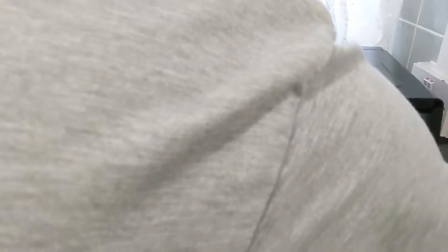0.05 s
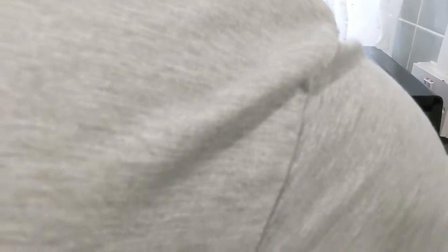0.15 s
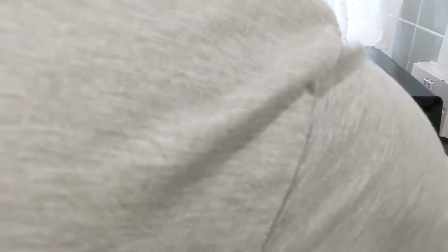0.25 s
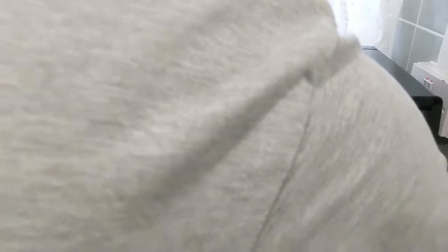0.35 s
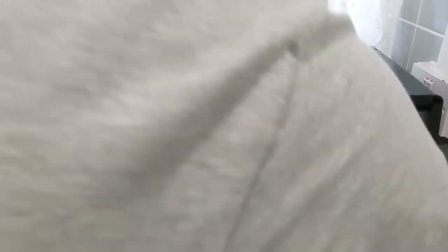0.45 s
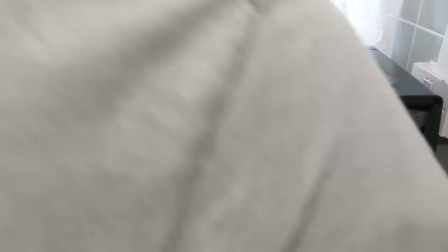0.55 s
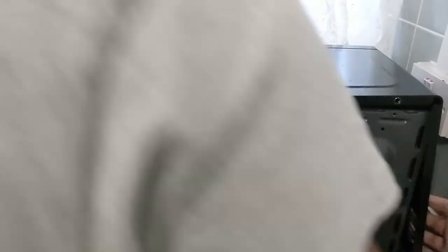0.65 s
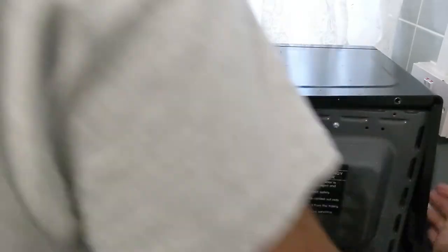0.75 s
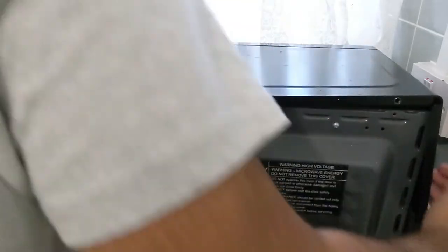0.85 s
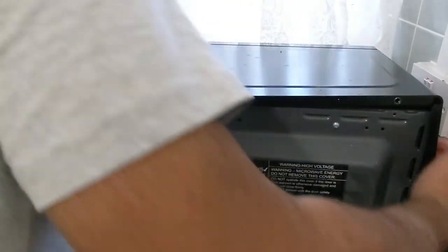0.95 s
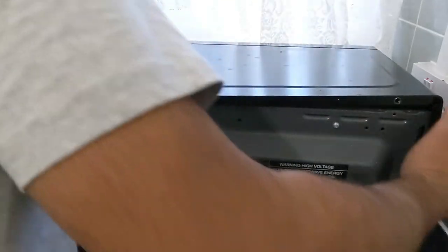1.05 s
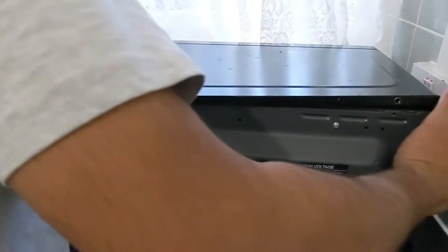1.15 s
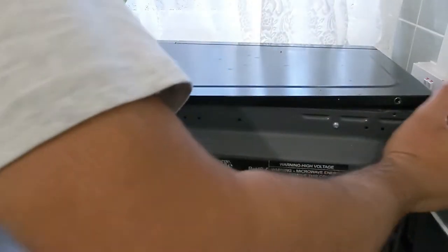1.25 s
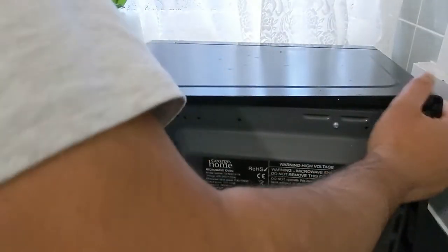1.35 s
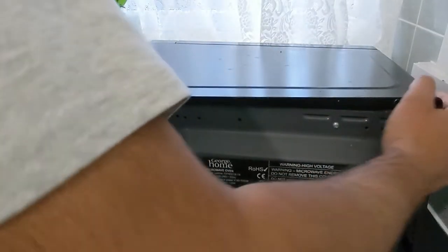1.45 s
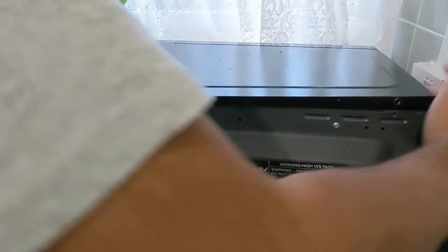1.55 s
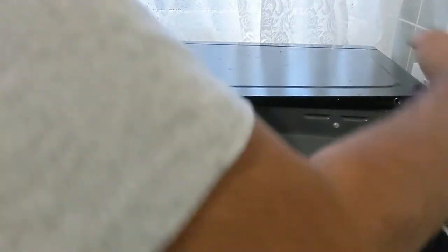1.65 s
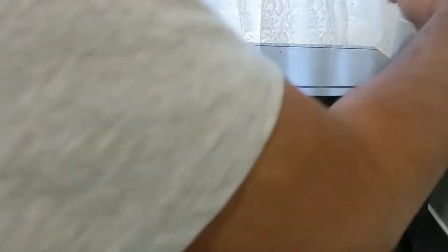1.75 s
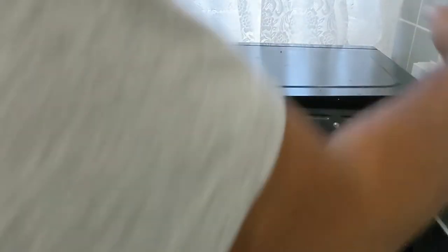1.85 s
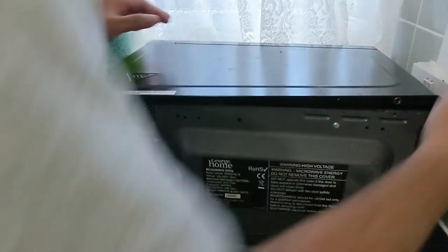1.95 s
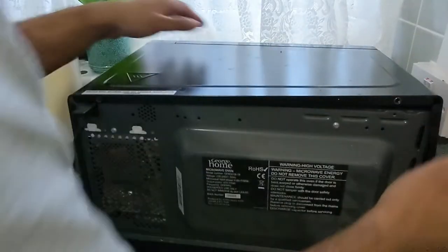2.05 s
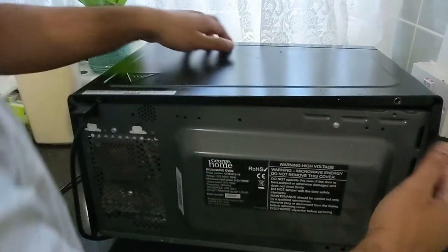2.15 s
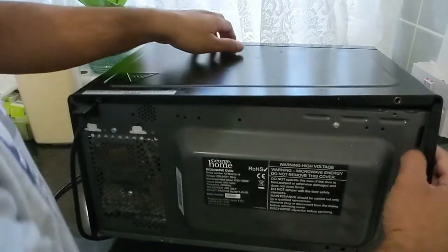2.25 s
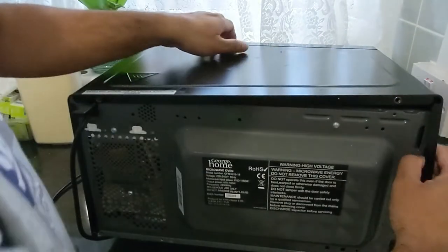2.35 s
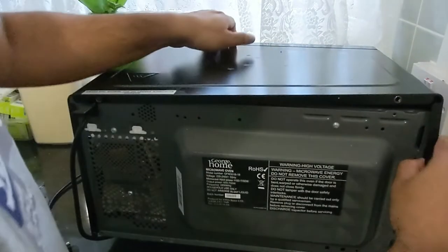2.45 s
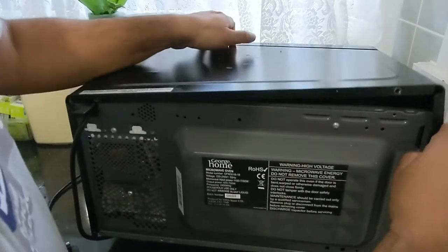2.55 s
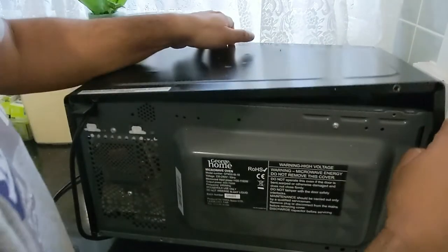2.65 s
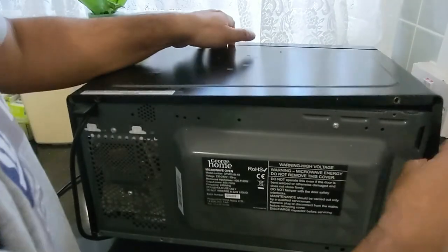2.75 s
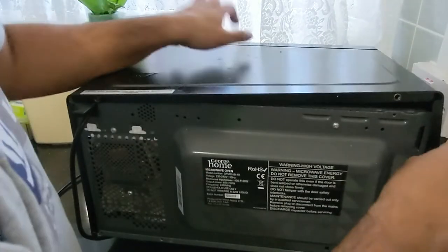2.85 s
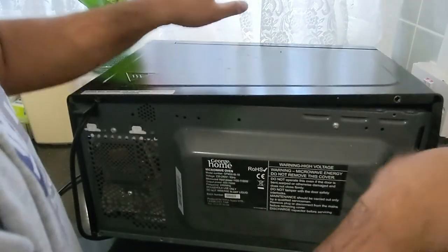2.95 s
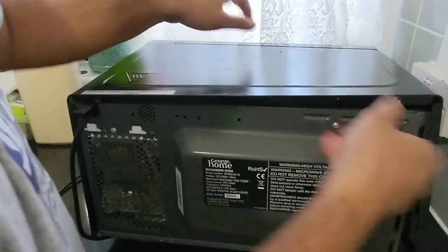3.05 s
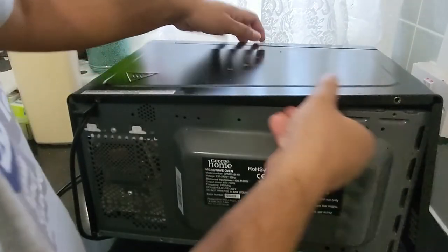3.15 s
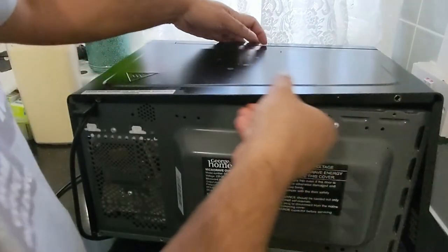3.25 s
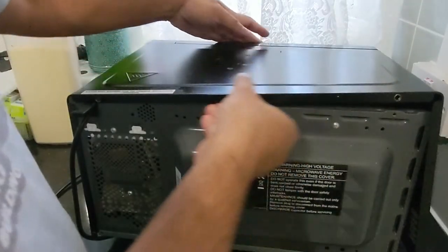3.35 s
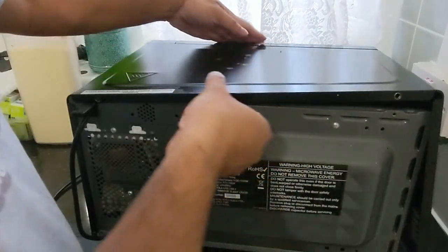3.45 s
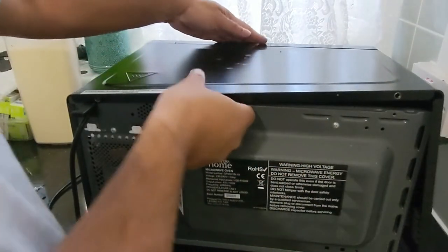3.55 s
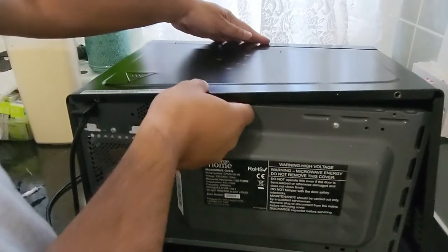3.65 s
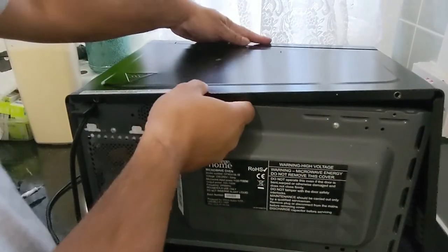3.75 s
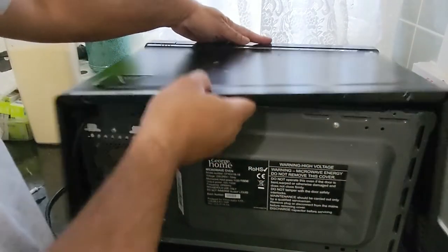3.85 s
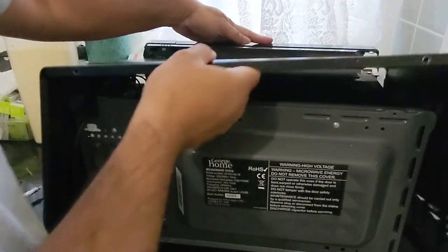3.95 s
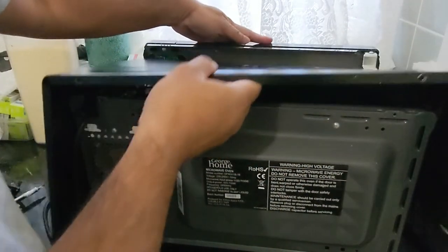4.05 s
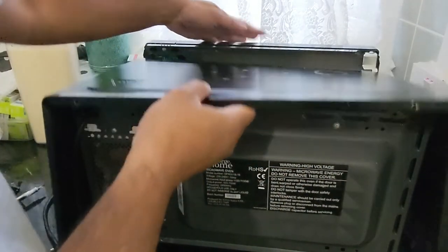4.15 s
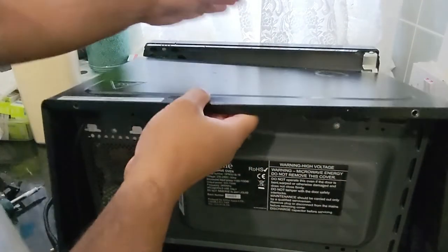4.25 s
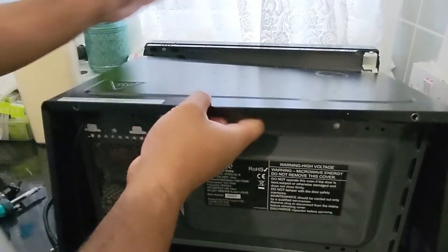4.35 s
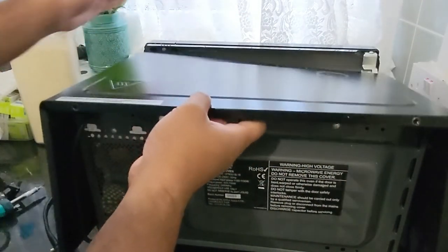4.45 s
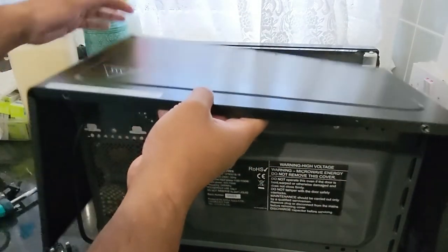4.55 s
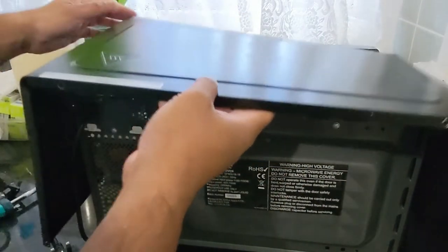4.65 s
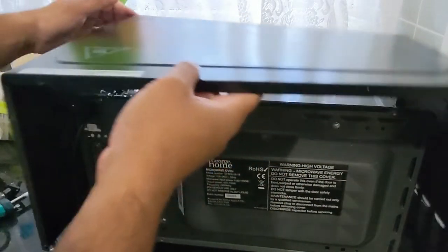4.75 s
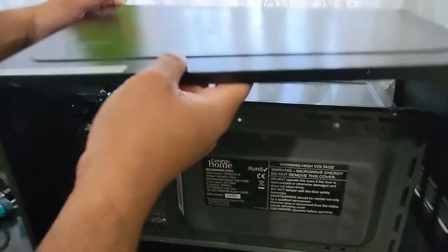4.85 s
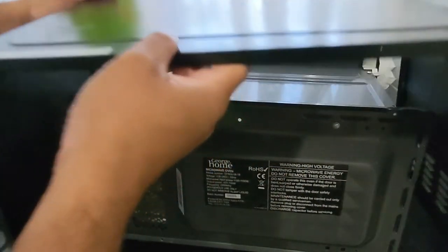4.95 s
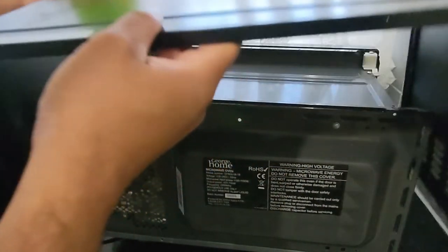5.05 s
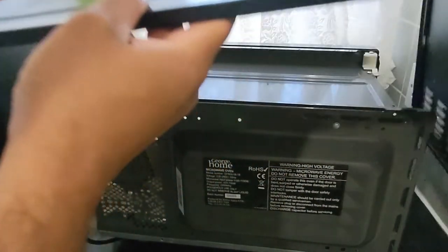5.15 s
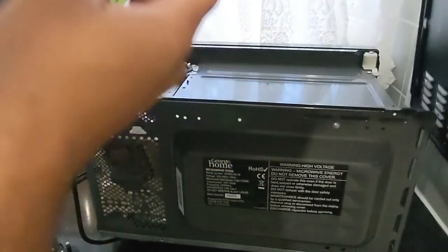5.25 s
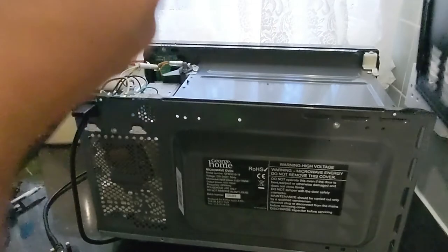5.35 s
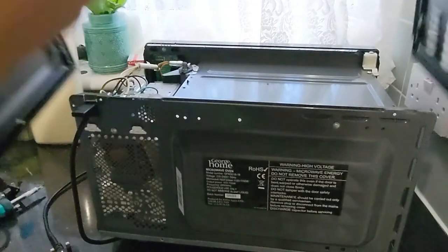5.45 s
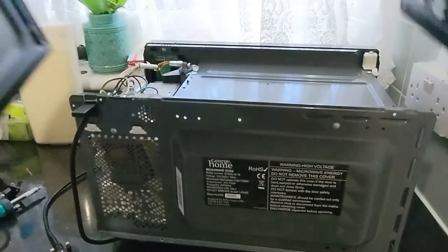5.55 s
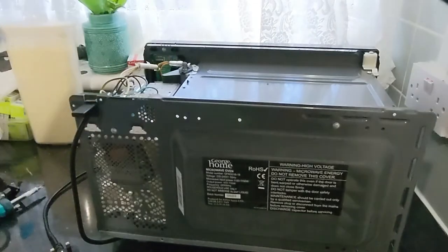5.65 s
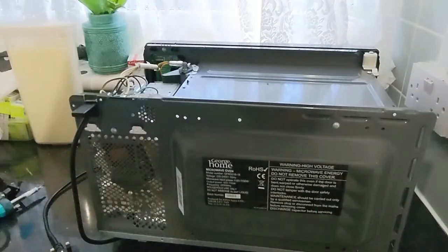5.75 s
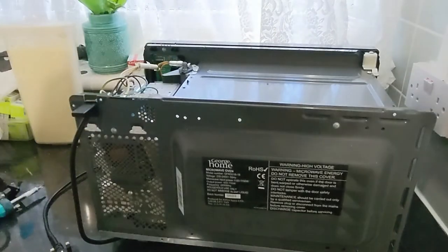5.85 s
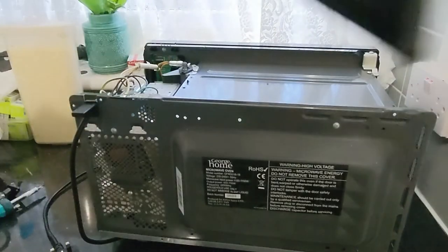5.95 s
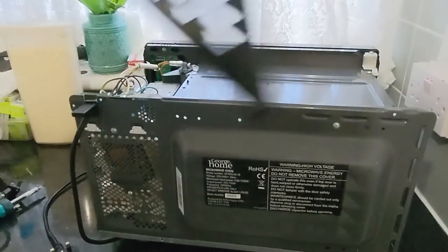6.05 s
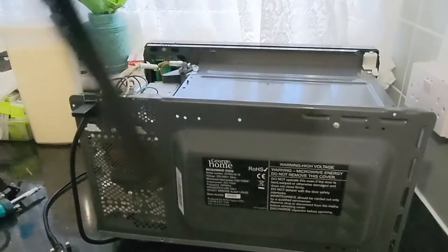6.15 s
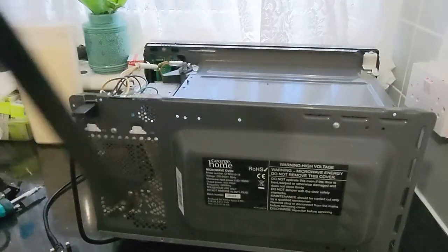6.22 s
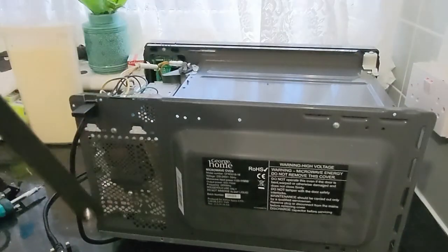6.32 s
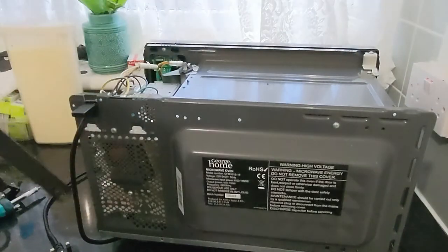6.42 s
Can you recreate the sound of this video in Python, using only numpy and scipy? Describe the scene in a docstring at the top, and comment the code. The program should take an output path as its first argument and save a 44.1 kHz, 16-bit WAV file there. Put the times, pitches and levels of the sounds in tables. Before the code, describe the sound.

Hands knock and rub a metal appliance cover, then it breaks loose with loud scraping, clashing and ringing before quiet room air returns.

```python
"""Oven cover lifted off its frame

Small tiled kitchen, heard close by in stereo: hands knock, rub and flex a microwave oven's seated sheet-metal cover.
It breaks free, scrapes and clashes along the frame and rings, then grazes something as it is carried away.
Taps set off decaying noise bands and, once loose, wavering modes; strokes are trains of tiny taps.
Flexes, squeaks and hum are tones; swishing cloth and skin and the room air are shaped noise."""
import sys
import numpy as np
from scipy import signal
from scipy.io import wavfile

SR = 44100
rng = np.random.default_rng(int(sys.argv[2]) if len(sys.argv) > 2 else 0)


def inscribe(sig):
    """Save sig as 16-bit PCM at rate SR to the path in sys.argv[1].

    A 1-D sig is mono; a 2-D sig holds one channel per row.
    Samples are clipped to [-1, 1] before scaling.
    """
    pcm = np.round(np.clip(np.atleast_2d(sig).T, -1, 1) * 32767)
    wavfile.write(sys.argv[1], SR, pcm.astype(np.int16))


N = 286031
TIME = np.arange(N) / SR

# Levels are relative: mixing trims follow. Hardness pivots at 1 kHz; left-right is positive to the left.
# clashes of the loose cover: [t/s, strength level/dB, hardness/(dB per octave), left-right/dB]
CLASHES = [(3.869, -13, 1, 0), (3.8965, -7.5, 0.5, 2.5), (3.9075, -27.5, 7.2, -4), (3.9455, -22.5, 2, -5),
           (3.954, -14.5, 2, 4), (4.0423, -12, 0.1, 0), (4.1094, -12.5, -3, -3), (4.1744, -19.5, -3.5, -4),
           (4.265, -22.5, -4.5, 0), (4.3643, -25, 0.7, -1), (4.4997, -30.5, -1.5, 1),
           (4.535, -28.5, -0.3, 0), (4.55, -30.5, -0.5, -2), (4.6094, -18, 0, 0), (4.6259, -7, 0.83, 3),
           (4.6546, -18, -3.5, -1), (4.6815, -15.5, 1.35, -1.5), (4.7385, -14.5, 1.3, -0.5),
           (4.7944, -17.5, -1.5, 7), (4.838, -15.5, -0.5, 1), (4.9787, -23, -0.8, -0.5),
           (5.1091, -27, 2.5, 2), (5.1216, -22.5, -1.3, -1), (5.1672, -25.5, 2, -0.5),
           (5.2795, -25, -2.2, -16), (5.3155, -20, -1.6, 0), (5.357, -12, 1.85, 0.5),
           (5.3874, -15, 0.2, -1)]
# drags of its edges along the frame, at last through the hands:
# [start t/s, length/s, pressure level/dB, hardness/(dB per octave)]
DRAGS = [(3.852, 0.13, -18.5, -3.9), (3.97, 0.2, -13, -0.84), (4.2, 0.096, -21.5, 0.3),
         (4.35, 0.087, -27.5, -1.6), (4.53, 0.11, -23.5, -2), (4.64, 0.16, -16, -1.5),
         (4.86, 0.095, -27.5, -2.5), (4.98, 0.1, -24, -2), (5.13, 0.15, -26.5, 1.1), (5.3, 0.2, -25.5, -2),
         (6.12, 0.2, -55, -1.5), (6.37, .12, -46, 0.1)]
# strong modes of the loose cover: [f/Hz, level/dB]
COVER_MODES = [(134, 2), (142, 1.5), (216, 6.5), (229, -35), (249, -1.5), (299, -3), (366, -5), (397, -1),
               (478, -3.5), (503, 4.5), (566, -1), (596, -7), (630, 1), (701, 0.5), (756, 0), (816, -22),
               (870, -16.5), (1006, -18), (1045, -8), (1213, -6), (1288, -7), (1300, -3), (1392, -5.5),
               (2223, -14.5), (2300, -8)]
# how long those modes ring: [f/Hz, time to fall 60 dB/s]
COVER_T60 = [(140, .48), (230, .5), (400, .64), (700, .55), (1300, .48), (2300, .34)]
# the loose sheet's crowd of weaker modes: [f/Hz, level/dB per Hz]
LOOSE_COLOUR = [(35, -19), (62, -4.5), (100, -24), (135, -2.5), (210, -8), (300, -3), (500, -1),
                (950, -11.5), (1300, -16), (1700, -13.5), (3200, -22), (5000, -22.5), (6800, -18.5),
                (10000, -29), (14000, -24)]
# how fast that crowd dies away: [f/Hz, time to fall 60 dB/s]
LOOSE_T60 = [(100, 0.64), (400, 0.33), (1500, 0.4), (5000, 0.32), (14000, 0.2)]
# knocks on the seated, damped cover: [t/s, strength level/dB, hardness/(dB per octave), left-right/dB]
KNOCKS = [(.1665, -38, -1.2, -2), (.2555, -33.5, .5, -1.5), (.358, -32, -1.9, -4),
          (.4064, -39.5, -2.7, -10), (.515, -45.5, 0, 1), (.7691, -47, -3, -3), (1.4885, -62, 7, -1),
          (1.572, -50, -.3, -1), (1.6634, -57, 5.6, -1), (2.1732, -29, 1.9, 1.5), (2.359, -31, 1.2, 0),
          (2.578, -39, -3.5, 0), (2.6396, -41, -2.7, 1), (2.7583, -21, 1, 1.5), (2.7813, -26, -2.5, -4),
          (2.8384, -49, 5.7, -1), (3.159, -35, .4, -2.5), (3.1838, -35.5, 2.6, 2), (3.533, -44, -1.5, 3),
          (3.689, -43, -1.5, 0), (3.766, -40, -6, 1)]
# strokes of the hands on the seated cover: [start t/s, length/s, pressure level/dB, hardness/(dB per octave)]
RUBS = [(.1, 0.049, -44.5, -1.5), (.16, 0.2, -36.5, -2), (.35, .09, -38.5, 0), (.48, .14, -52, -3.5),
        (.77, 0.069, -44.5, -1.5), (.92, 0.18, -66, -4.5), (1.1, 0.31, -57.5, 2.2),
        (1.39, 0.081, -42.5, -2), (1.52, 0.33, -53, -1.2), (2.21, 0.087, -29, -1.14),
        (2.36, 0.046, -39, -2.5), (2.55, 0.21, -37.5, -2), (2.72, 0.12, -28.5, -2.5),
        (2.86, 0.18, -45.5, -2), (3.18, 0.078, -37, -3), (3.35, .13, -51, -3.2), (3.57, 0.11, -47.5, -3),
        (3.69, 0.39, -41.5, -1)]
# the seated sheet's crowd of modes: [f/Hz, level/dB per Hz]
SEATED_COLOUR = [(35, -25), (60, 9.5), (90, -32), (140, 7.5), (200, 0), (290, -15.5), (420, -3.5),
                 (700, -18.5), (1250, -19), (1700, -20), (3200, -33), (5000, -39), (6800, -34.5),
                 (10000, -50), (14000, -43)]
# how fast the seated sheet dies away: [f/Hz, time to fall 60 dB/s]
SEATED_T60 = [(100, 0.4), (400, 0.34), (1500, 0.39), (5000, 0.34), (14000, 0.34)]
# the cover's edge clacks on something in passing: [t/s, strength level/dB, hardness/(dB per octave), left-right/dB]
CLACKS = [(5.7414, -50.5, 7.5, 2.5), (5.8325, -38, -0.5, 8), (5.8368, -26, 1, 0.5), (5.858, -49.5, -6.5, 1)]
# the edge brushes past: [start t/s, length/s, pressure level/dB, hardness/(dB per octave)]
BRUSHES = [(5.785, 0.07, -31.5, 3.06)]
# colour of the passing clack: [f/Hz, level/dB per Hz]
GRAZE_COLOUR = [(59, -51), (100, -15), (215, -8), (249, -13), (583, -7), (676, -17.5), (2370, -13),
                (3540, -26), (14100, -37), (16000, -41)]
# decay of the passing clack: [f/Hz, time to fall 60 dB/s]
GRAZE_T60 = [(400, 0.62), (2000, 0.33), (12000, 0.42)]
# squeaks and groans of skin and metal: [t/s, f/Hz, level/dB, width/Hz, fade time constant/s]
SQUEAKS = [(.256, 485, -34, 300, 0.061), (.364, 1200, -30, 148, 0.038), (.37, 814, -29.5, 62.5, 0.038),
           (.778, 456, -57, 305, 0.065), (1.425, 512, -43.5, 260, .05), (1.577, 676, -45, 107, 0.071),
           (1.669, 2250, -50.5, 900, 0.052), (1.78, 1970, -51, 1320, .05), (2.175, 827, -25.5, 258, .018),
           (2.578, 499.6, -31.5, 296, 0.098), (3.183, 448, -30, 92, 0.031), (3.769, 598, -30, 174, 0.015),
           (4.21, 3860, -33, 200, 0.026), (4.265, 3790, -29.5, 180, 0.037), (4.364, 3850, -30.5, 200, 0.04),
           (4.628, 1335, -14, 126, .041), (4.802, 481, -10, 67, 0.034), (4.996, 3110, -29, 163, .026),
           (6.21, 632, -49, 62.4, 0.1), (6.365, 630, -39.5, 48, 0.039)]
# a dragged edge sets the modes around one pitch singing:
# [t/s, centre f/Hz, spread/octaves, level/dB, fade time constant/s]
SINGING = [(4.031, 493, 0.061, -13, 0.25), (4.07, 761, .2, -11.5, 0.098), (5.375, 402, 0.13, -12, 0.078)]
# a panel flexes and booms: [crest t/s, f/Hz, level/dB, half length/s]
FLEXES = [(.208, 174, -28.5, .025), (.345, 144, -25.5, 0.013), (1.44, 165, -35.5, 0.04),
          (2.08, 59.7, -47, .086), (2.25, 198, -29.5, 0.022), (2.315, 57.4, -25.5, 0.056),
          (2.81, 207, -25.5, 0.058), (2.88, 143, -24.5, 0.062), (2.9, 195, -31.5, 0.094),
          (3.38, 137, -29.5, 0.026), (3.71, 127, -34, 0.025), (4.06, 250.5, -21, 0.06),
          (4.2, 140.2, -17.5, .15), (4.72, 139, -37, 0.15), (4.73, 210.4, -17, 0.056),
          (5.19, 60, -26, 0.054), (5.45, 133.2, -14.5, .041)]
# sleeve and palm swishing: [crest t/s, level/dB, half length/s]
SWISHES = [(.32, -68, 0.16), (1.167, -57.5, 0.045), (1.49, -57.5, .11), (3.39, -56, 0.089),
           (3.75, -63, .05), (6.25, -60, 0.36)]
# colour of that bright hiss: [f/Hz, level/dB per Hz]
SWISH_COLOUR = [(300, -20), (1500, 8), (4000, -4), (7000, 1.5), (10500, -2), (14000, 2)]
# colour of the room air: [f/Hz, level/dB per Hz]
AIR_COLOUR = [(18, -35), (30, 4), (86, 7.5), (221, 0.5), (287, -3), (540, -1.5), (937, -15.5), (1390, -11),
              (1540, -19.5), (2290, -13), (3580, -21), (7090, -20.5), (10800, -24.5), (14000, -15),
              (16000, -49)]
# steady hum: [f/Hz, level/dB]
HUM = [(217, -59.5), (395, -71), (1425, -71.5)]
# likeness of the left and right noise: [f/Hz, correlation]
LIKENESS = [(60, .98), (150, .96), (270, .6), (500, .25), (1000, -.1), (3000, 0), (14000, 0)]
# edges between the four registers boom, clang, rattle and tick: [f/Hz]
CROSSOVERS_HZ = [300, 1000, 3500]
# middles of the four registers: [f/Hz]
REGISTER_HZ = np.array([170, 550, 1900, 7000])

LEFT_RIGHT = np.array([[1], [-1]])
AIR_DB = -52.5
SINGING_WIDTH_HZ, SINGING_DB, FRICTION_DB = 9.5, -8.0, 4.5
EASE_DB_PER_S, LET_GO_S = 7.5, 0.021
CUTOFF_HZ = 15800


def loose_cover(count=4):
    """Held only by its edges, the sheet rings on its own modes, in a different mix at each place."""
    places = []
    for _ in range(count):
        modes = cover_modes(swell_s=0.0073, spread_hz=615, uneven_db=1.5)
        crowd = sheet(LOOSE_COLOUR, LOOSE_T60, build_cycles=1.7, crack_db=-3.5, crack_s=0.01)
        places.append(registers(modes + crowd))
    clashes = blows(CLASHES, places[1:], trim_db=[-8.5, -7.5, -8.5, -12.0], chatter_s=0.006, chatter_db=-11.5)
    drags = sliding(DRAGS, places[0], trim_db=[-6.0, -2.0, -6.5, -11.0],
                    slips_per_s=170, uneven_db=5.5, grip_s=0.017)
    return clashes + drags


def seated_cover(count=3):
    """Frame and hands damp the sheet: short, dull knocks and rubbing."""
    places = [registers(sheet(SEATED_COLOUR, SEATED_T60, build_cycles=0.77, crack_db=3.5, crack_s=0.016))
              for _ in range(count)]
    knocks = blows(KNOCKS, places, trim_db=[-9.5, -3.5, -7.0, -13.5], chatter_s=0.0053, chatter_db=-24.5)
    rubs = sliding(RUBS, places[0], trim_db=[-2.5, -3.5, -11.0, -13.0],
                   slips_per_s=800, uneven_db=3.5, grip_s=0.01)
    return knocks + rubs


def graze():
    """A light, dry clack and brush of the edge, made of decaying noise without the cover's strong modes."""
    place = registers(sheet(GRAZE_COLOUR, GRAZE_T60, build_cycles=0.15, crack_db=21.5, crack_s=0.0014))
    clacks = blows(CLACKS, [place], trim_db=[-14.5, -20.0, -2.5, -18.5], chatter_s=0.0054, chatter_db=-9.0)
    brushes = sliding(BRUSHES, place, trim_db=[-18.0, 1.5, 2.5, 0.5],
                      slips_per_s=960, uneven_db=5.0, grip_s=0.061)
    return clacks + brushes


def squeaks():
    """Short squeaks, and the cover modes that a drag keeps singing: the nearer its pitch, the louder."""
    sung = []
    for s, centre, spread, db, fade_s in SINGING:
        for hz, _ in COVER_MODES:
            octaves = np.log2(hz / centre)
            if abs(octaves) < 2 * spread:
                sung.append((s, hz, db - 3 * (octaves / spread) ** 2, SINGING_WIDTH_HZ, fade_s))
    return friction_tones(SQUEAKS) + from_db(SINGING_DB) * friction_tones(sung)


def panel_flexes():
    """A flexing panel booms: low tones that swell and fade, equal in both channels."""
    return sum(from_db(db) * bell(s, half) * np.sin(2 * np.pi * hz * (TIME - s)) for s, hz, db, half in FLEXES)


def swish():
    """Cloth and skin gliding give a fine, smooth hiss that swells with each move of the arm."""
    level = sum(from_db(db) * bell(s, half) for s, db, half in SWISHES)
    return level * rms_one(sum(band for _, band in noise_bands(SWISH_COLOUR, N)))


def room_air():
    """The room's soft rumble and hiss, as shaped noise, with a faint hum of steady tones."""
    air = from_db(AIR_DB) * rms_one(sum(band for _, band in noise_bands(AIR_COLOUR, N)))
    return air + sum(from_db(db) * np.sin(2 * np.pi * hz * TIME) for hz, db in HUM)


def cover_modes(swell_s, spread_hz, uneven_db):
    """Strong modes waver as the sheet flexes; the higher they are, the more their phase differs left to right."""
    t, out = TIME[:SR], 0
    for k, (hz, level_db) in enumerate(COVER_MODES):
        # up to 45 degrees each way, turning opposite ways from one mode to the next
        apart = (-1) ** k * np.pi / 4 * min((hz / spread_hz) ** 2, 1) * LEFT_RIGHT
        bend = 0.004 * rms_one(butter(rng.standard_normal(2 * SR), 14, "low")[SR:])
        phase = 2 * np.pi * hz * np.cumsum(1 + bend) / SR
        ring_db = level_db + rng.normal() * uneven_db - 60 * t / at_hz(COVER_T60, hz)
        out = out + from_db(ring_db) * np.sin(phase + apart)
    return rms_one(out * (1 - np.exp(-t / swell_s)))


def sheet(spectrum, t60s, build_cycles, crack_db, crack_s):
    """Sheet and room answer one tap: the treble speaks at once, the slow bending waves swell later."""
    t, out = TIME[:SR], 0
    for hz, band in noise_bands(spectrum, SR):
        swell = 1 - np.exp(-t / (build_cycles / hz + 0.00015))
        decay = from_db(-60 * t / at_hz(t60s, hz))
        crack = from_db(crack_db) * np.exp(-t / crack_s) * hz / (hz + 2000)  # brief, mostly treble
        out = out + band * swell * (decay + crack)
    return rms_one(out)


def blows(rows, places, trim_db, chatter_s, chatter_db, count=6):
    """Blows take the places of the sheet in turn: a first touch and a few quick rebounds of the thin edge."""
    out = np.zeros((2, N + 2 * SR))
    for k, (s, db, hardness, pan) in enumerate(rows):
        gains = register_gains(db, hardness, trim_db)
        low, *upper = [gain * part for gain, part in zip(gains, places[k % len(places)])]
        bright = sum(upper) * from_db(pan / 2 * LEFT_RIGHT)
        at = round(s * SR)
        out[:, at:at + SR] += low + bright  # long waves reach both channels alike
        for delay, size in zip(rng.exponential(1, count), rng.standard_normal(count)):
            at = round((s + delay * chatter_s) * SR)
            rebound = size * from_db(chatter_db) * np.exp(-delay / 2)
            out[:, at:at + SR] += bright * rebound  # rebounds are too light to boom
    return out[:, :N]


def sliding(rows, place, trim_db, slips_per_s, uneven_db, grip_s):
    """During each stroke the contact sticks and slips in tiny uneven steps, each of which taps the sheet."""
    gains = np.array([register_gains(db, hardness, trim_db) for _, _, db, hardness in rows])
    strokes = np.array([stroke(start, length, grip_s) for start, length, _, _ in rows])
    forces = gains.T @ strokes  # one force curve per register
    sizes = from_db(uneven_db * np.minimum(rng.exponential(1, N), 4)) * rng.choice([-1, 1], N)
    slips = rms_one(sizes * (rng.random(N) < slips_per_s / SR))
    out = 0
    for part, force in zip(place, forces):
        taps = slips * force / np.sqrt(np.sum(part ** 2) / 2)
        out = out + signal.fftconvolve(taps[None], part, axes=1)[:, :N]
    return out


def stroke(start, length, grip_s):
    """Force of one stroke over time: it takes hold, eases off and lets go."""
    t = np.maximum(TIME - start, 0)
    hold = 1 - np.exp(-t / grip_s)
    let_go = np.exp(-np.maximum(t - length, 0) / LET_GO_S)
    return hold * from_db(-EASE_DB_PER_S * t) * let_go


def friction_tones(rows):
    """Friction sounds as narrow tones, wavering in pitch and level, that catch quickly and fade."""
    t, out = TIME[:SR], np.zeros((2, N + SR))
    for s, hz, db, width_hz, fade_s in rows:
        waver = rms_one(butter(rng.standard_normal((2, 2 * SR)), width_hz / 2, "low")[:, SR:])
        pitch_hz = hz + width_hz / 2 * waver[::-1]  # each channel's pitch follows the other's level
        tone = (1 + waver / 2) * np.sin(2 * np.pi * np.cumsum(pitch_hz, axis=1) / SR)
        envelope = (1 - np.exp(-10 * t / fade_s)) * np.exp(-t / fade_s)
        at = round(s * SR)
        out[:, at:at + SR] += from_db(db + FRICTION_DB) * tone * envelope
    return out[:, :N]


def registers(answer):
    """Split an answer into boom, clang, rattle and tick, each at rms 1 over its first 40 ms."""
    low, middle, high = CROSSOVERS_HZ
    bands = [(low, "low"), ([low, middle], "band"), ([middle, high], "band"), (high, "high")]
    parts = [butter(answer, hz, kind, order=4) for hz, kind in bands]
    return [part / np.sqrt(np.mean(part[:, :SR // 25] ** 2)) for part in parts]


def register_gains(db, hardness, trim_db):
    """A hard contact favours the high registers, a soft one the low."""
    octaves = np.log2(np.array(REGISTER_HZ) / 1000)
    return from_db(db + hardness * octaves + np.array(trim_db))


def noise_bands(spectrum, size):
    """Roughly half-octave bands of stereo noise, alike in both channels in the bass: (Hz, band) pairs."""
    edges = np.geomspace(30, 17000, 20)
    white = rng.standard_normal((2, 2, size + SR // 4))  # extra lead-in lets the filters settle
    for k, (low, high) in enumerate(zip(edges, edges[1:])):
        mid, side = butter(white[k % 2], [low, high], "band")[:, -size:]
        hz = np.sqrt(low * high)
        alike = np.clip(at_hz(LIKENESS, hz), -1, 1)
        stereo = np.sqrt(1 + alike) * mid + np.sqrt(1 - alike) * side * LEFT_RIGHT
        yield hz, from_db(at_hz(spectrum, hz)) * stereo


def bell(crest_s, half_s):
    """A smooth Gaussian rise and fall."""
    return np.exp(-((TIME - crest_s) / half_s) ** 2 / 2)


def from_db(db):
    """Decibels to gain."""
    return 10 ** (np.asarray(db) / 20)


def rms_one(x):
    """Scale to rms 1."""
    return x / np.sqrt(np.mean(x ** 2) + 1e-20)


def at_hz(points, hz):
    """Read a table on a log-frequency axis."""
    known_hz, values = np.transpose(points)
    return np.interp(np.log(hz), np.log(known_hz), values)


def butter(x, hz, kind, order=2):
    """Causal Butterworth filter."""
    return signal.sosfilt(signal.butter(order, hz, kind, fs=SR, output="sos"), x + 1e-18)


def scene():
    """The cover close by, over the quiet room; its low clang leans to the left, its treble to the right."""
    cover = loose_cover() + seated_cover() + graze() + squeaks() + panel_flexes()
    clang = butter(cover, [230, 330], "band", order=1)
    treble = butter(cover, 5400, "high", order=1)
    lean = 0.08 * clang - 0.15 * treble
    return cover + lean * LEFT_RIGHT + swish() + room_air()


def record(dry):
    """Microphone end: the deepest bass is lost, the highest peaks are rounded, the top is cut."""
    rounded = 1.135 * np.tanh(butter(dry, 43, "high") / 1.429)
    return signal.sosfilt(signal.ellip(10, 0.2, 70, CUTOFF_HZ, fs=SR, output="sos"), rounded)


dry = scene()
out = record(dry)
inscribe(out)
```